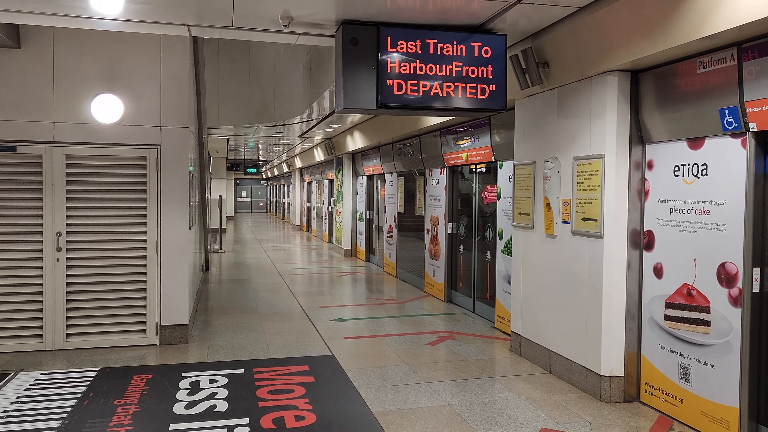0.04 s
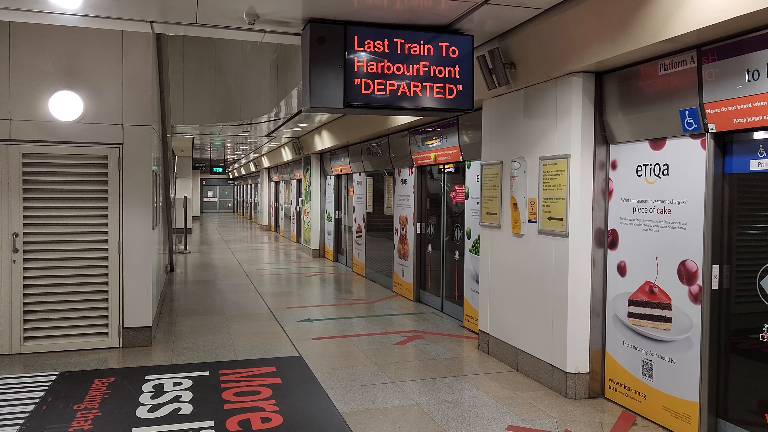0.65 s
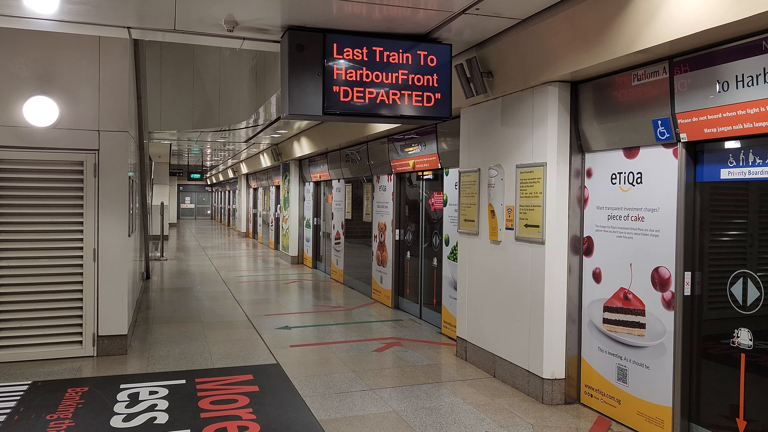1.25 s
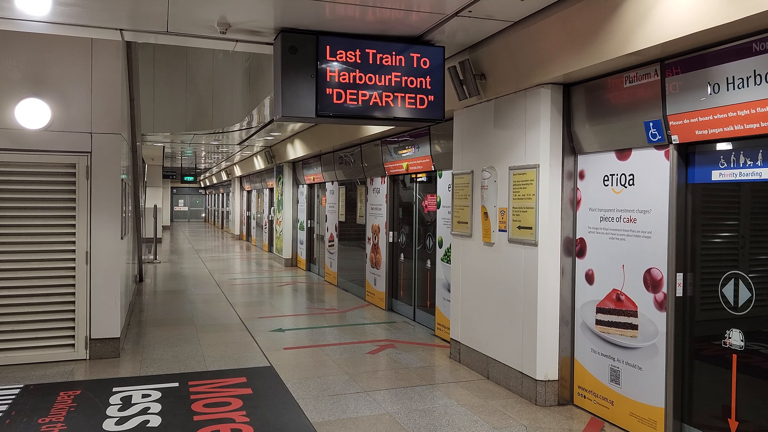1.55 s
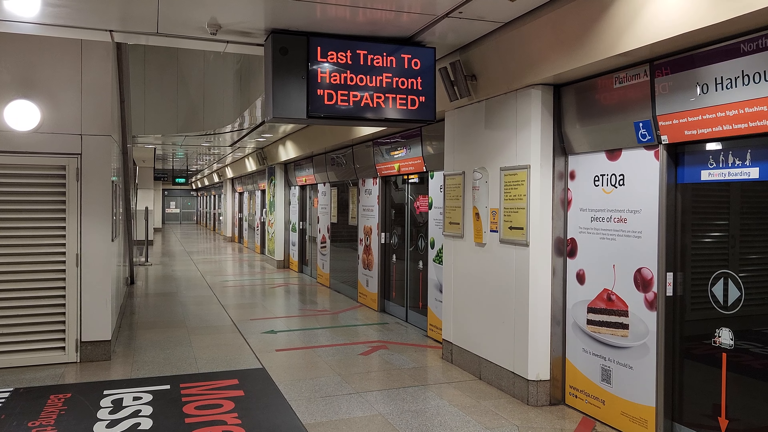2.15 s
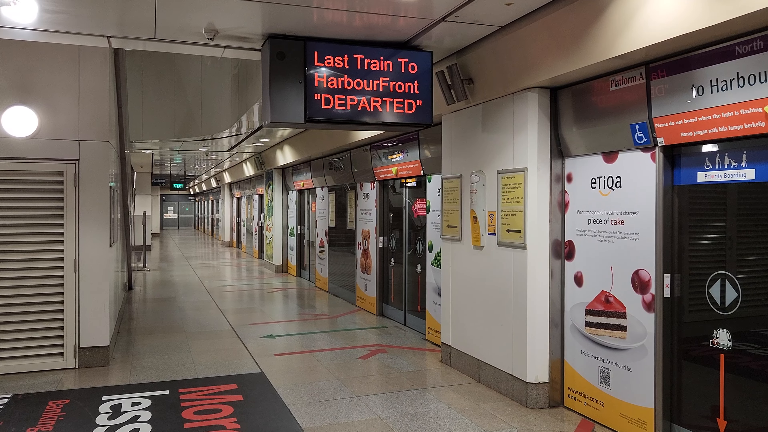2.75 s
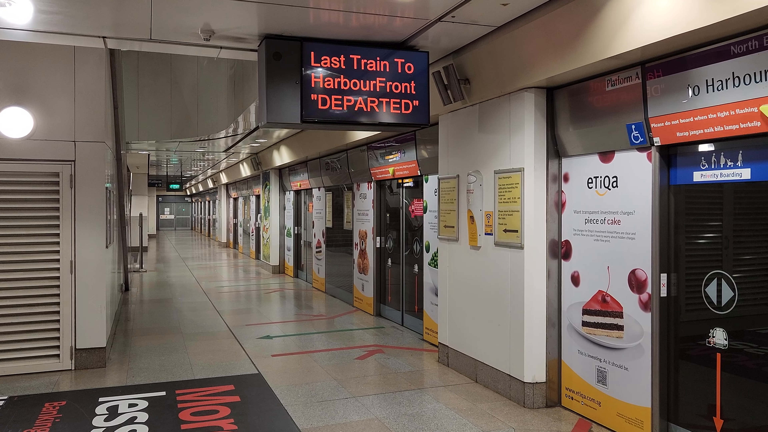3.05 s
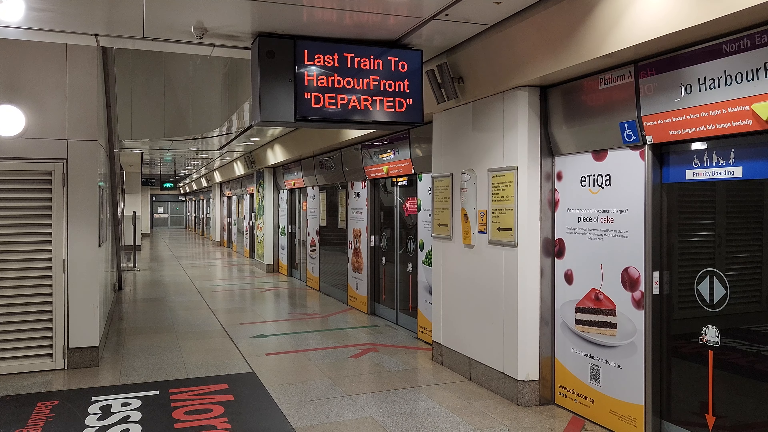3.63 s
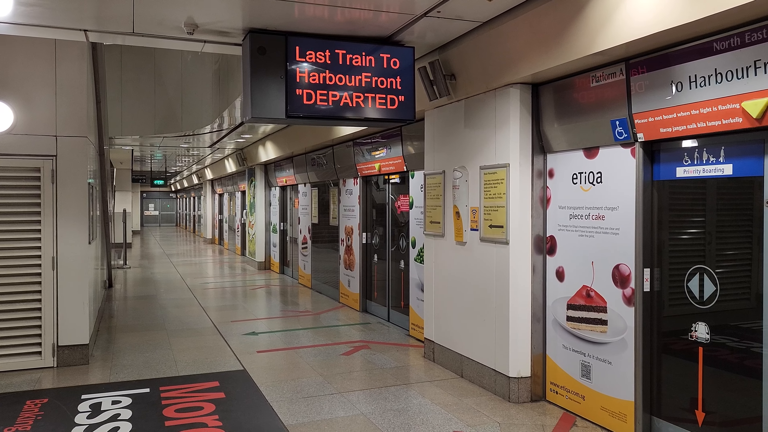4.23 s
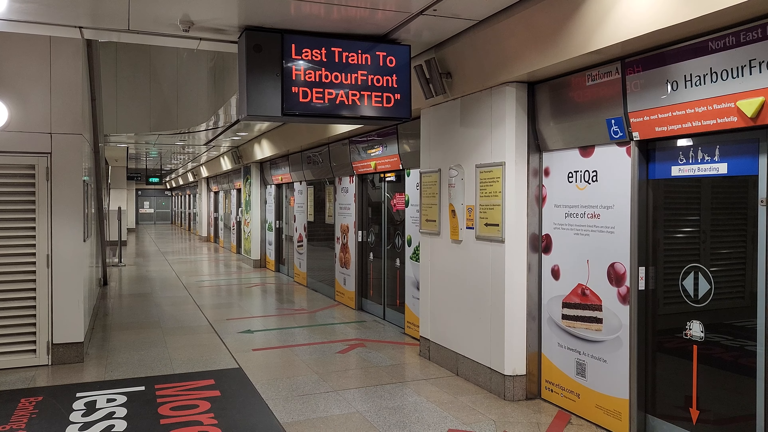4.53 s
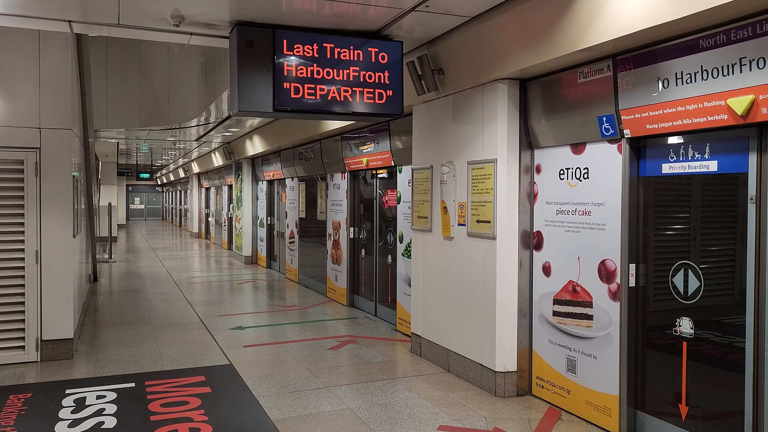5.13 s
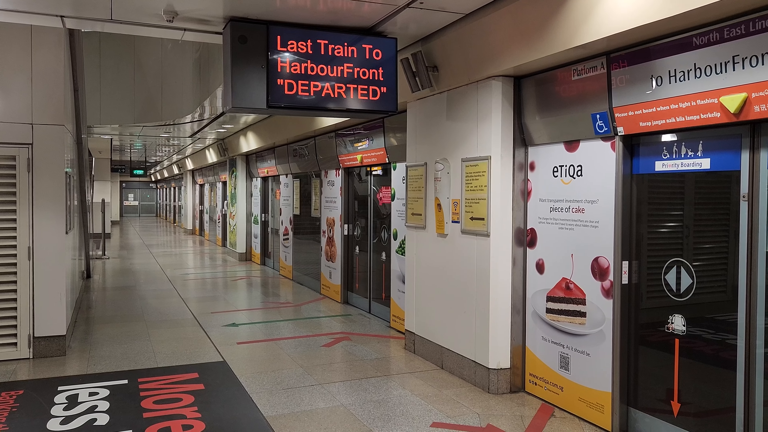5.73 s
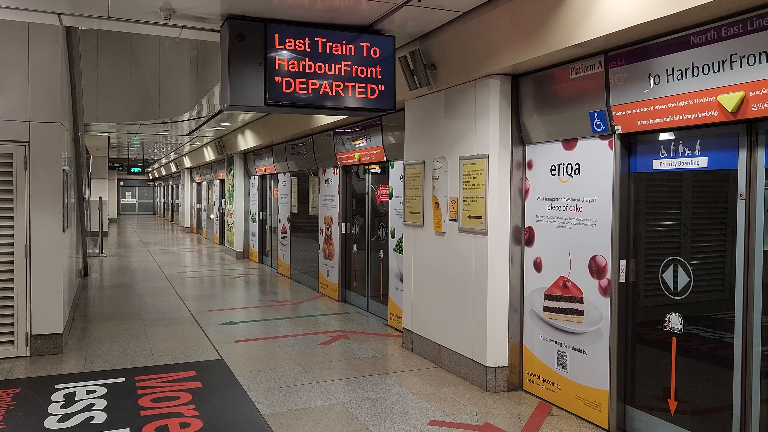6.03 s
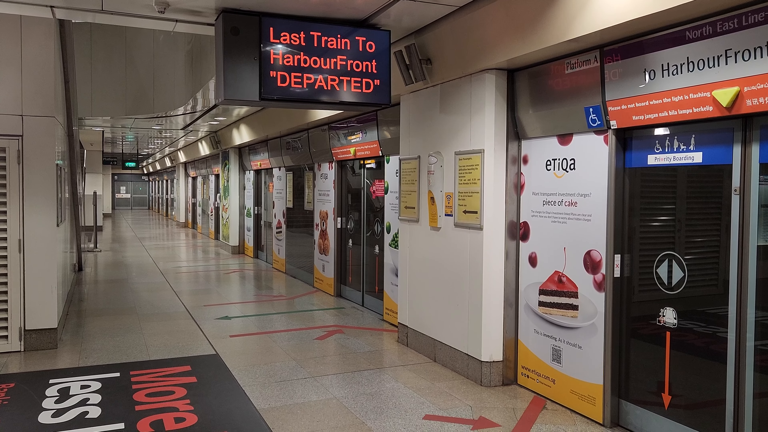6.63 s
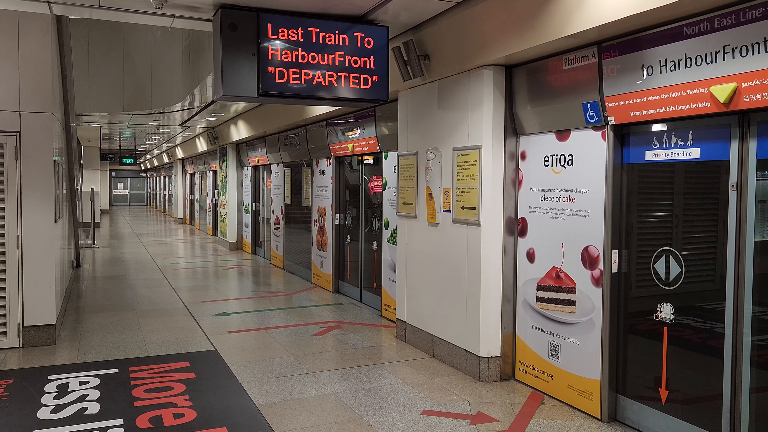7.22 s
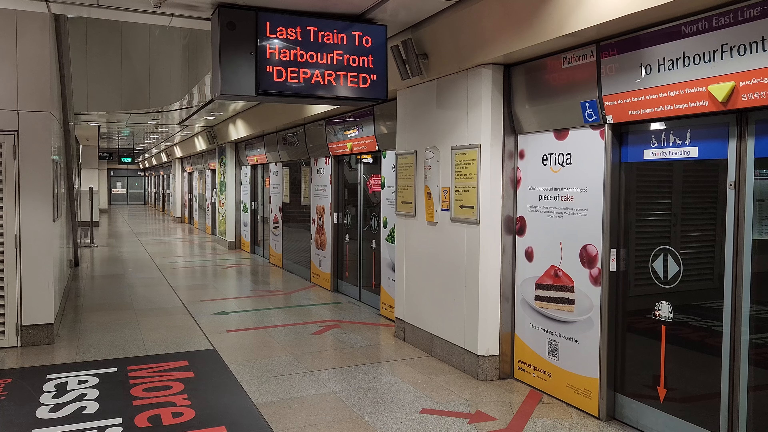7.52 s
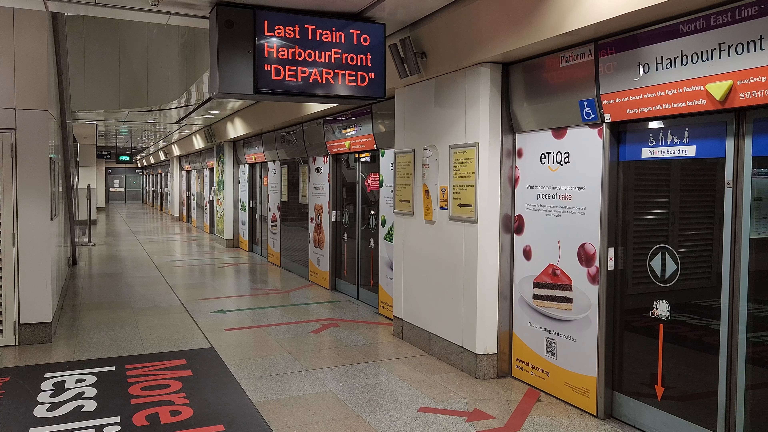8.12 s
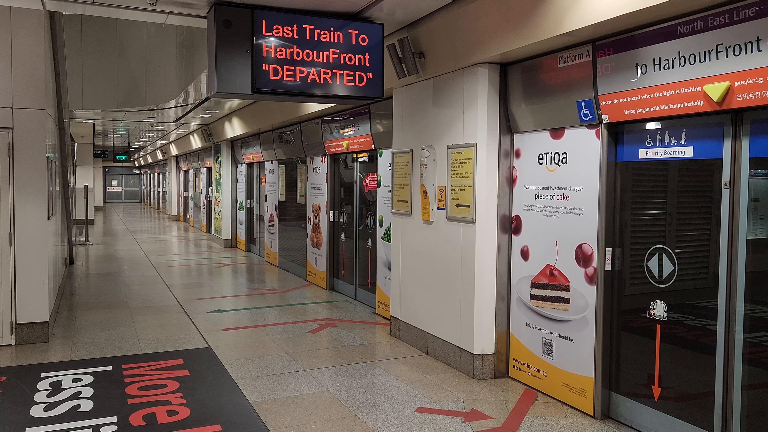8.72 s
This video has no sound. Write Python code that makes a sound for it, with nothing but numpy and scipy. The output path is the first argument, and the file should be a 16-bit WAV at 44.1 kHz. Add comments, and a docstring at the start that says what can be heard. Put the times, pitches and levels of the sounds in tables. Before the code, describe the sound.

Ventilation ducts roar steadily on an empty underground platform, with fan tones and a low electrical hum throughout. An electric train rumbles in the tunnel behind the platform doors. Its wheel noise and rail hiss are present at the start, drop away by about half a second, then return from around 2 seconds. A soft hiss of escaping air on the right fades out between 2.3 and 3 seconds. The deep rumble throbs and gradually swells, with a heavy surge near 3 seconds and several more between 6 and 9 seconds. A thin, high rail whine sinks slightly in pitch and grows clearer as the train nears. From about 7 seconds a low growl of running gear builds, and the train is loudest at the end, near 9 seconds. Faint dry clicks and brief rustles are scattered throughout, close to the microphone.

```python
"""An empty underground platform, where ventilation ducts roar and fans hum over the mains tone.
An electric train runs in the tunnel behind the screen doors: its rumble swells, the tunnel's air column
booms and the running gear growls. Rolling wheels make the rails hiss and sing, louder as the train
nears, while their whine sinks a little. Air escapes softly on the right until a valve closes,
and small friction rustles and dry clicks sound close to the microphone."""
import sys
import numpy as np
from scipy import signal
from scipy.fft import rfft, irfft, next_fast_len
from scipy.io import wavfile
from scipy.ndimage import uniform_filter1d

SR = 44100
rng = np.random.default_rng(int(sys.argv[2]) if len(sys.argv) > 2 else 0)


def unload_audio(sound):
    """Save the sound as a 16-bit wav file, at the path given as the first command line argument."""
    columns = np.transpose(np.atleast_2d(sound))
    # keep every value between -1 and 1, then stretch to whole-number steps
    steps = np.round(np.clip(columns, -1, 1) * 32767)
    wavfile.write(sys.argv[1], SR, steps.astype(np.int16))


N = 395577
TIME, FREQ = np.arange(N) / SR, np.fft.rfftfreq(N, 1 / SR)

# resonances of the ducts and platform: (frequency [Hz], width [Hz], gain [dB])
HALL_MODES = [(213.8, 9.9, 4), (286, 23, 2), (359, 20, 1.5), (547.5, 29, 4), (595.5, 30, 5.5),
              (660, 55, 3.5), (704, 25, 3.5), (823, 54, 2), (977, 51, 4.5), (1040, 45, 2), (1480, 216, 3.5),
              (2130, 440, 2), (5600, 220, 4.5), (6220, 500, 3.5), (7330, 560, 3.5), (9100, 480, 2),
              (12800, 700, 0)]
# likeness of a diffuse field at the two microphone ports: (frequency [Hz], coherence [-1 to 1])
COHERENCE = [(30, .996), (60, .9987), (95, .996), (150, .98), (205, .945), (350, .84), (550, .64),
             (960, .17), (1670, -.08), (2900, .08), (6000, 0), (13000, .15)]
# how near the train sounds: (time [s], relative level [dB])
NEARNESS = [(0, -3.5), (0.6, -19), (1.4, -14), (2.3, -7), (3.5, -4), (4.3, -5), (5.2, -3), (6.2, -2.5),
            (7, -1), (8, -1), (8.97, 0)]


def gain_of(db):
    """Decibels to amplitude."""
    return 10 ** (np.asarray(db) / 20)


def unit_rms(x):
    """Normalisation to a mean power of 1."""
    return x / np.sqrt(np.mean(abs(x) ** 2) + 1e-30)


def spectrum(points):
    """Interpolation of (frequency [Hz], value) rows along a logarithmic frequency axis."""
    hz, value = np.transpose(points)
    return np.interp(np.log(FREQ + 1), np.log(hz + 1), value)


def follow(points):
    """Linear interpolation of (time [s], value) rows at every sample."""
    return np.interp(TIME, *np.transpose(points))


def bell(offset, width):
    """Gaussian of height 1, with the given full width at half height."""
    return .5 ** ((2 * offset / width) ** 2)


def resonances_db(modes):
    """Modal response: each resonance adds a bell-shaped peak to the spectrum."""
    return sum(db * bell(FREQ - hz, width) for hz, width, db in modes)


def drift(width_hz):
    """Random complex modulation of rms 1; it spreads a carrier into a narrow band of noise."""
    size = next_fast_len(N)
    real, imag = rng.standard_normal((2, size))
    band = bell(np.fft.fftfreq(size, 1 / SR), width_hz)
    return unit_rms(np.fft.ifft((real + 1j * imag) * band)[:N])


def sustained(width_hz, steady=0):
    """Forced vibration: a steadily driven resonance wavers in amplitude but seldom dies away."""
    waver = drift(width_hz) + steady
    return waver / np.sqrt(abs(waver) ** 2 + .25)


def diffuse(density_db):
    """Diffuse-field noise: coherent at the two ports in the bass, nearly unrelated in the treble."""
    a, b = rfft(rng.standard_normal((2, N)))
    coherence = spectrum(COHERENCE)
    ports = np.array([a, coherence * a + np.sqrt(1 - coherence ** 2) * b])
    return irfft(ports * gain_of(density_db), N) * np.sqrt(SR / 2)


def ventilation(waver_hz=7, swell_db=0.56):
    """Ducts roar steadily; mains and fan tones waver by multipath interference in the hall."""
    # duct roar: (frequency [Hz], density [dB per Hz])
    roar = [(20, -92), (45, -47), (120, -55.5), (190, -58), (235, -63), (340, -62.5), (470, -68.5),
            (700, -69.5), (900, -74), (2000, -79.5), (2600, -83.5), (5000, -97), (9000, -102.5),
            (14000, -111)]
    # mains and fan tones: (frequency [Hz], left level [dB], right level [dB], scattered share [0-1])
    tones = [(99.2, -33, -32.5, 0.15), (202.7, -47, -46.5, 0.6), (324.1, -51.5, -52.5, 0.56),
             (698, -52.5, -59, 0.48), (1222, -60, -66.5, 0.6), (1824, -61, -74, 0.6),
             (1834, -62, -61, 0.15)]
    out = diffuse(spectrum(roar) + resonances_db(HALL_MODES)) * gain_of(swell_db * drift(11).real)
    for hz, left_db, right_db, share in tones:
        coherence = np.interp(hz, FREQ, spectrum(COHERENCE))
        a, b = drift(waver_hz), drift(waver_hz)
        scattered = np.array([a, coherence * a + np.sqrt(1 - coherence ** 2) * b])
        direct = np.exp(1j * np.array([[0], [np.arccos(coherence)]]))
        carrier = np.exp(2j * np.pi * (hz * TIME + rng.random()))
        tone = (np.sqrt(1 - share ** 2) * direct + share * scattered) * carrier
        out += np.sqrt(2) * gain_of([[left_db], [right_db]]) * tone.real
    return out


def escaping_air(level_db=-3.5, shut_s=2.27, closing_s=0.58, drop_db=22):
    """Turbulent escaping air hisses, mostly on the right, and fades ever faster as a valve closes."""
    # air hiss: (frequency [Hz], relative density [dB per Hz])
    colour = [(1500, -110), (2900, -87), (4250, -83), (5200, -88), (6500, -104), (12000, -125)]
    closing = np.clip((TIME - shut_s) / closing_s, 0, 2)
    pan = gain_of([[-6], [1]])
    return diffuse(spectrum(colour)) * gain_of(level_db - drop_db * closing ** 2) * pan


def throbbing_db(depth, throb_db=1.5, width_hz=20.4, surge_s=0.031):
    """Amplitude modulation: the rumble throbs at random, with a few heavy surges."""
    # surges of the rumble: (time [s], boost [dB])
    surges = [(3.14, 9), (6.37, 8.5), (6.43, 1), (6.83, 9), (6.95, 6), (7.17, 9.5), (7.7, 0), (8.01, 8),
              (8.74, 6), (8.87, 3.5)]
    surge_db = sum(db * bell(TIME - s, surge_s) for s, db in surges)
    return depth * throb_db * unit_rms(drift(width_hz).real) + surge_db


def tunnel_rumble(trim_db=-0.07, top_share_db=-1.44, full_boom_db=-21, boom_growth=0.96):
    """Air-column resonance: the louder the rumble, the more of its power gathers in the tunnel's boom."""
    # swell of the rumble as the train draws in: (time [s], level [dB])
    swell = [(0, -33), (0.3, -28), (0.55, -34.5), (1.1, -26.5), (1.6, -31), (2.1, -29.5), (2.8, -26),
             (3.5, -24.5), (4.25, -25.5), (5.2, -26), (5.75, -22), (6.25, -22), (7, -19.5), (7.6, -21),
             (8.2, -22), (8.65, -21), (8.97, -19)]
    # rumble noise: (frequency [Hz], relative level [dB])
    colour = [(14, -53), (22, -16), (33, -7.5), (46, 2.5), (55, 0), (77, 1.5), (90, -4), (108, -14),
              (126, -8), (150, -24), (260, -33), (600, -47.5), (1500, -99)]
    # resonance of the air column: (time [s], frequency [Hz])
    boom_pitch = [(1.2, 75), (3, 63), (3.9, 68), (5.1, 66), (6.4, 65), (7.1, 69), (7.5, 63), (8.3, 58.5),
                  (8.7, 59), (8.97, 70)]
    level_db = follow(swell)
    share = gain_of(top_share_db + boom_growth * np.minimum(level_db - full_boom_db, 0))
    carrier = np.exp(2j * np.pi * np.cumsum(follow(boom_pitch)) / SR)
    boom = unit_rms((sustained(width_hz=11, steady=.7) * carrier).real)
    bass = np.sqrt(1 - share ** 2) * unit_rms(diffuse(spectrum(colour))) + share * boom
    power = uniform_filter1d(uniform_filter1d(bass[0] ** 2, size=3200), size=1800)
    levelled = bass / np.sqrt(power + 1e-6)
    throb_depth = 1 - .4 * share ** 2  # the rumble throbs less as the boom takes a larger share
    return levelled * gain_of(level_db + trim_db + throbbing_db(throb_depth))


def wheels(hiss_growth=1.43, flutter_db=0.5):
    """Rolling noise excites hall and rail modes; the hiss grows faster than the roar as the train nears."""
    # roar of wheels on rails at their nearest: (frequency [Hz], density [dB per Hz])
    roar_colour = [(60, -60), (150, -59.5), (280, -64.5), (420, -69.5), (600, -70), (900, -75.5),
                   (1450, -76), (1800, -76), (2500, -93.5), (5000, -105), (15000, -130)]
    # hiss of the rails at their nearest: (frequency [Hz], density [dB per Hz])
    hiss_colour = [(800, -105), (1600, -94), (2000, -77), (2300, -77.5), (2750, -83.5), (3200, -93.5),
                   (3800, -87.5), (4800, -88.5), (6000, -99), (9000, -110), (15000, -120)]
    # ringing bands of the rails: (frequency [Hz], width [Hz], gain [dB])
    rail_modes = [(2050, 180, 4), (2430, 110, 3.5), (3475, 150, 8.5), (3990, 70, -1), (4220, 90, -1),
                  (4800, 220, 2.5), (5420, 270, 6)]
    near_db = follow(NEARNESS) + flutter_db * drift(13).real
    roar = diffuse(spectrum(roar_colour) + resonances_db(HALL_MODES))
    hiss = diffuse(spectrum(hiss_colour) + resonances_db(rail_modes))
    return roar * gain_of(near_db) + hiss * gain_of(hiss_growth * near_db)


def rail_whine(level_db=-52, growth=2.4, sag_hz_per_s=11.5):
    """Narrow-band resonance: the rails sing, sinking slowly in pitch and standing out as the train nears."""
    # core and skirt of the whine: (starting frequency [Hz], width [Hz], relative level [dB])
    bands = [(2455, 28, -1.2), (2428, 90, -3.5)]
    out = np.zeros((2, N))
    for start_hz, width_hz, db in bands:
        hz = start_hz - sag_hz_per_s * TIME
        carrier = np.exp(2j * np.pi * np.cumsum(hz) / SR)
        waver = np.array([sustained(width_hz), sustained(width_hz)])
        out += unit_rms((waver * carrier).real) * gain_of(db)
    return out * gain_of(level_db + growth * follow(NEARNESS))


def band_passed(x, hz, octaves):
    """Band-pass filtering by a Gaussian in log frequency; the result has rms 1."""
    size = x.shape[-1]
    offset = np.log2((np.fft.rfftfreq(size, 1 / SR) + 1) / hz)
    return unit_rms(irfft(rfft(x) * bell(offset, octaves), size))


def clicks(rise_s=.0003, decay_s=.0035):
    """Damped transients: close bursts of treble noise decay exponentially within milliseconds."""
    # dry ticks: (time [s], level [dB], centre [Hz], left minus right [dB])
    ticks = [(0.061, -53, 8000, 0), (0.555, -60, 11500, 7), (2.357, -57, 11000, -11),
             (2.369, -59, 11500, -10), (3.892, -51, 3500, 0), (4.675, -60, 8000, -7),
             (5.144, -56, 11500, 2), (5.554, -55, 8000, 0), (5.94, -59, 8000, -7), (6.816, -55, 8500, -2)]
    out, size = np.zeros((2, N)), SR // 20
    t = np.arange(size) / SR
    envelope = (1 - np.exp(-t / rise_s)) * np.exp(-t / decay_s)
    for s, db, hz, pan_db in ticks:
        burst = band_passed(rng.standard_normal((2, size)), hz, octaves=1.1)
        start = int(s * SR)
        out[:, start:start + size] += burst * envelope * gain_of([[db + pan_db / 2], [db - pan_db / 2]])
    return out


def rustles(level_db=-7.5, grain_db=2, faint_count=14, faint_db=-78, faint_s=.06, faint_hz=11000):
    """Friction noise: short swells of tiny grains, clear or faint, in which something small rings."""
    # clear rustles: (peak time [s], relative level [dB], length [s], centre [Hz], width [octaves])
    clear = [(0.092, -59, 0.16, 6800, 0.54), (1.113, -56, .08, 6500, 0.72), (2.72, -64, .2, 9500, .8),
             (3.21, -63, .2, 8500, .8), (3.42, -57, .07, 8800, .8), (3.795, -59, .06, 10000, .9),
             (4.93, -58, .07, 7300, .8), (5.165, -52, .07, 6800, 1), (5.598, -57, .1, 8200, 1.),
             (5.86, -62.5, .11, 12400, .35), (6.335, -59.5, .05, 8460, 1.), (6.82, -55, .08, 6800, 1.),
             (7.05, -64, .08, 12300, .25), (7.899, -58, 0.28, 5400, .9), (8.35, -63, .16, 12300, .3),
             (8.66, -63, .1, 7500, 0.71)]
    # ringing of the small object: (frequency [Hz], width [Hz], gain [dB])
    ring_modes = [(4670, 80, 12), (5430, 110, 8), (6243, 80, 14), (7060, 70, 13), (7660, 120, 7),
                  (9150, 120, 3), (10300, 130, 5), (11020, 130, 6), (11640, 160, 3)]
    spacing_s = N / SR / faint_count
    faint = [((k + when) * spacing_s, faint_db + 5 * (2 * force - 1), faint_s * (.5 + drag), faint_hz, .65)
             for k, (when, force, drag) in enumerate(rng.random((faint_count, 3)))]
    out, size = np.zeros((2, N)), SR // 2
    for s, db, length, hz, octaves in clear + faint:
        start = int(np.clip(s * SR - size / 2, 0, N - size))
        span = slice(start, start + size)
        roughness = unit_rms(uniform_filter1d(rng.standard_normal(size), size=60))
        grains = rng.standard_normal((2, size)) * gain_of(grain_db * roughness)
        scuff = band_passed(grains, hz, octaves * np.sqrt(2))
        envelope = np.sqrt(bell(TIME[span] - s, length))
        out[:, span] += gain_of(db + level_db) * scuff * envelope
    return irfft(rfft(out) * gain_of(resonances_db(ring_modes)), N)


def gear_growl():
    """Band-limited noise of the running gear, masked by the rumble until the train comes close."""
    # swell of the growl: (time [s], level [dB])
    swell = [(0, -47), (5, -40), (7, -34), (8.2, -31), (8.8, -26), (8.97, -31.5)]
    # growl noise: (frequency [Hz], relative level [dB])
    colour = [(45, -37), (80, 3.5), (102, -1.5), (135, -1), (175, -16.5), (240, -17), (360, -20),
              (600, -64.5)]
    return unit_rms(diffuse(spectrum(colour))) * gain_of(follow(swell))


def bass_lulls(x, lull_s=0.041, below_hz=160):
    """Low-band amplitude modulation: the whole bass, hum included, dips briefly now and then."""
    # dips of the bass: (time [s], gain [dB])
    lulls = [(3.2, -17), (3.74, -3), (4.24, -7), (6.05, -7), (7.44, -5), (8.1, -2.5), (8.35, -5),
             (8.78, -1)]
    bass = irfft(rfft(x) / (1 + (FREQ / below_hz) ** 8), N)
    dip_db = sum(db * bell(TIME - s, lull_s) for s, db in lulls)
    return x + bass * (gain_of(dip_db) - 1)


def combed(x, depth_db):
    """Comb filtering: echoes from nearby hard surfaces ripple the treble, differently at each port."""
    echoes = np.zeros((2, N))
    echoes[:, 40:500] = rng.standard_normal((2, 460)) / np.sqrt(np.arange(40, 500))
    ripple = unit_rms(rfft(echoes).real) * np.interp(FREQ, [100, 500, 6000], [0, .25, 1])
    return irfft(rfft(x) * gain_of(depth_db * ripple), N)


def scene():
    """Superposition of the platform, the train behind its doors, and the close rustles and clicks."""
    drone = bass_lulls(ventilation() + tunnel_rumble() + gear_growl())
    hall = drone + wheels() + rail_whine() + escaping_air()
    return combed(hall, depth_db=1.1) + combed(rustles(), depth_db=2.5) + clicks()


def record(dry):
    """Microphone response: the ports differ slightly in gain and bass phase, and the band is limited."""
    # gain difference of the ports: (frequency [Hz], left minus right [dB])
    balance = [(60, .35), (140, .55), (300, 1), (800, 1.3), (1250, .9), (1900, 1.8), (2900, 1.6),
               (4300, -.5), (7000, .3), (12000, 3.1)]
    # phase difference of the ports: (frequency [Hz], lead of the left [rad])
    lead = [(30, .12), (70, 0.12), (100, .05), (200, 0.021)]
    left = gain_of(spectrum(balance) / 2) * np.exp(.5j * spectrum(lead))
    ports = irfft(rfft(dry) * np.array([left, 1 / left]), N)
    low_pass = signal.firwin(767, cutoff=15720, window=("kaiser", 9), fs=SR)
    return signal.oaconvolve(ports, low_pass[None], "same")


dry = scene()
out = record(dry)
unload_audio(out)
```